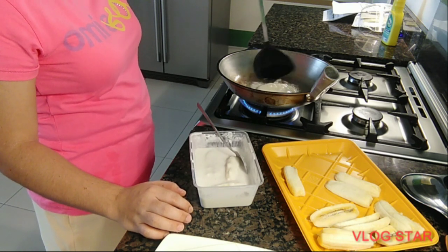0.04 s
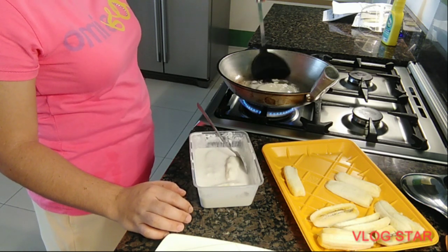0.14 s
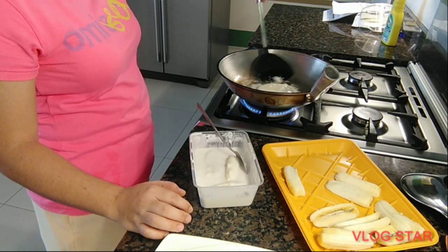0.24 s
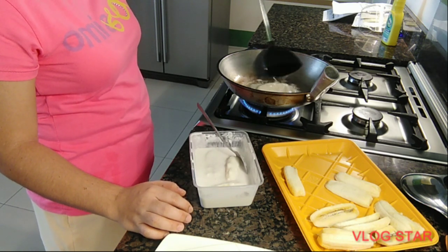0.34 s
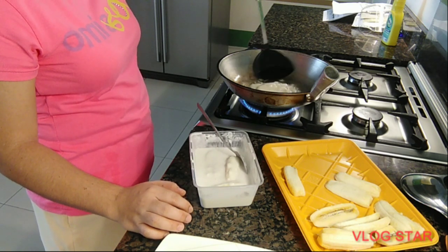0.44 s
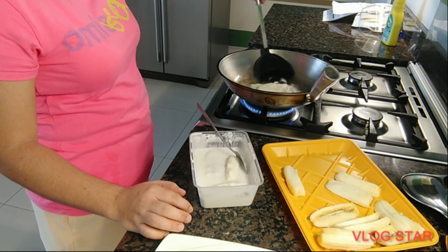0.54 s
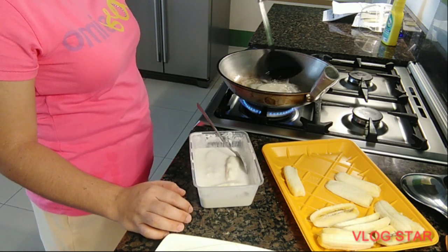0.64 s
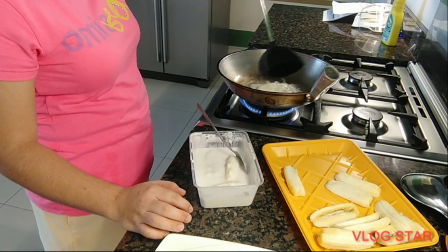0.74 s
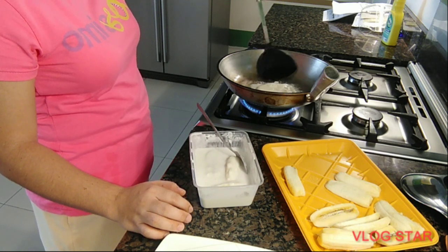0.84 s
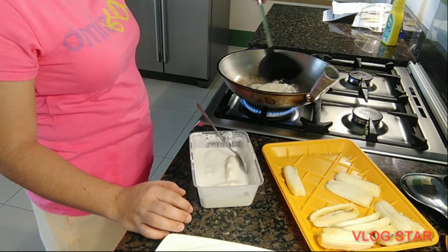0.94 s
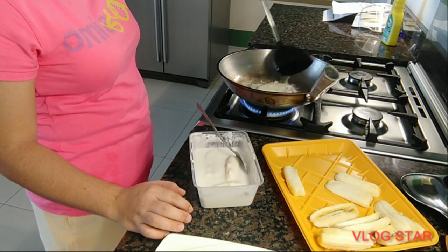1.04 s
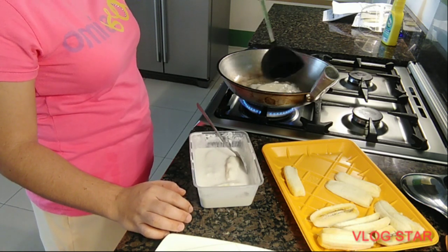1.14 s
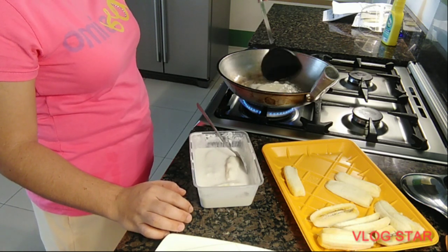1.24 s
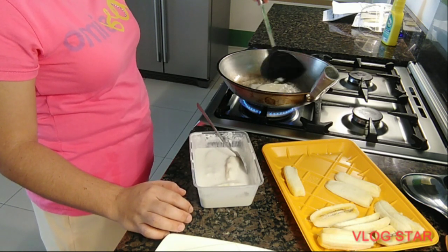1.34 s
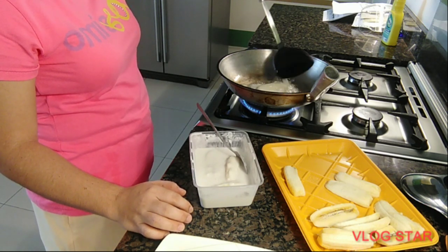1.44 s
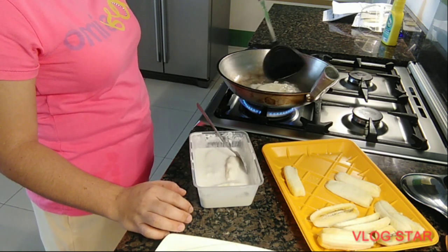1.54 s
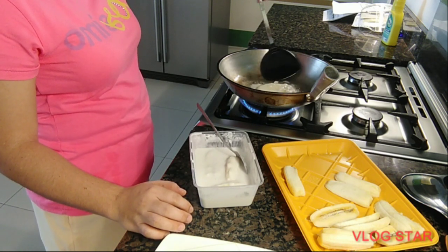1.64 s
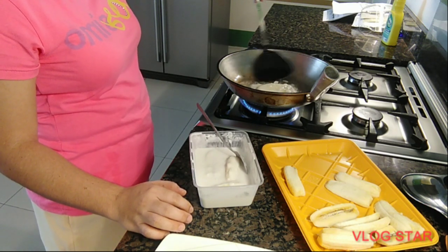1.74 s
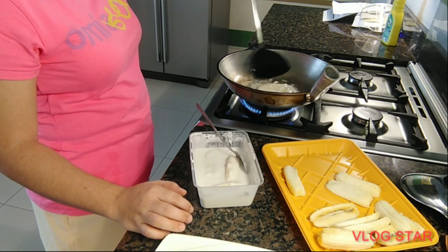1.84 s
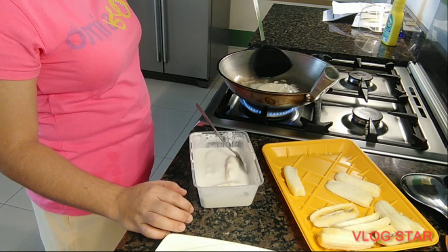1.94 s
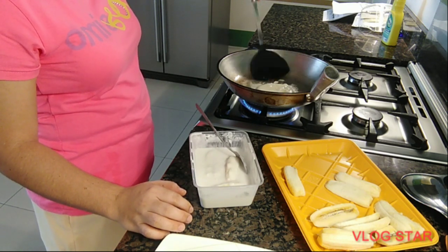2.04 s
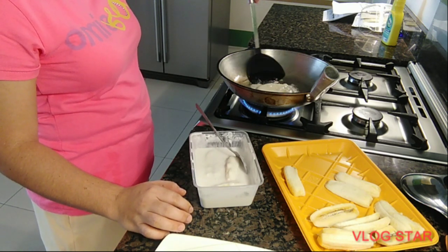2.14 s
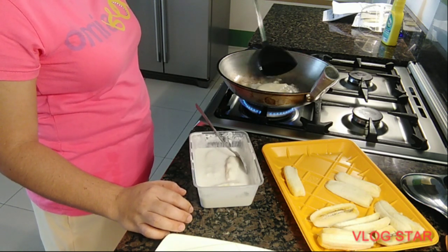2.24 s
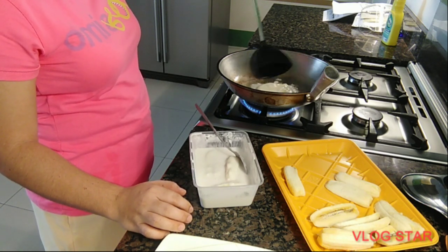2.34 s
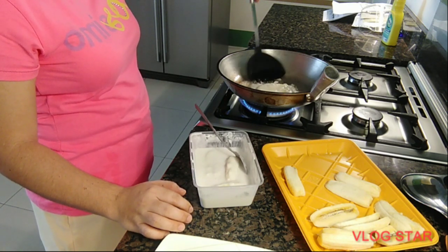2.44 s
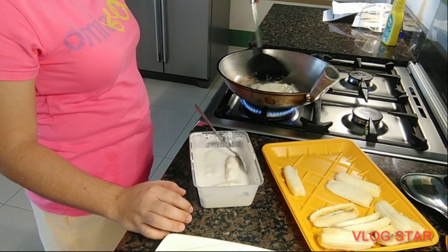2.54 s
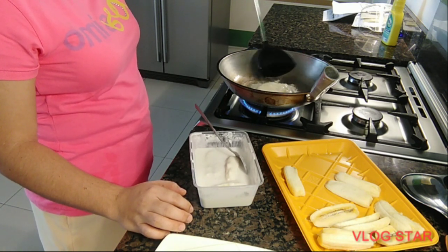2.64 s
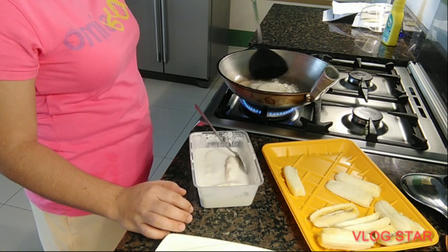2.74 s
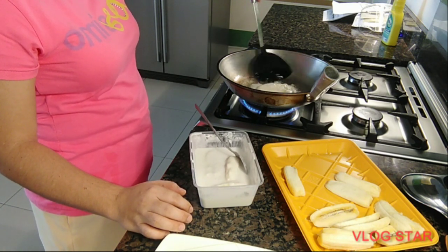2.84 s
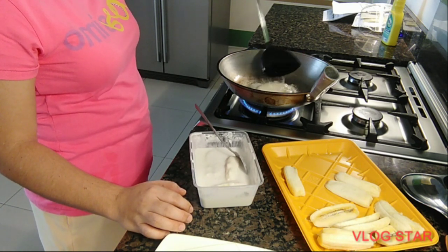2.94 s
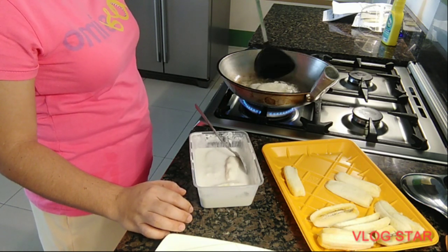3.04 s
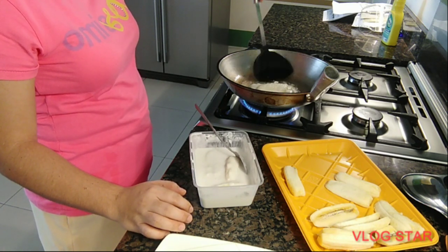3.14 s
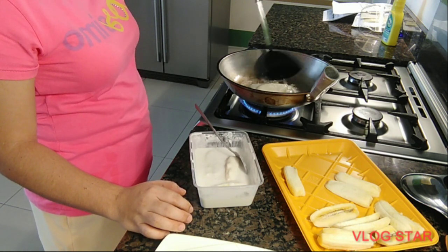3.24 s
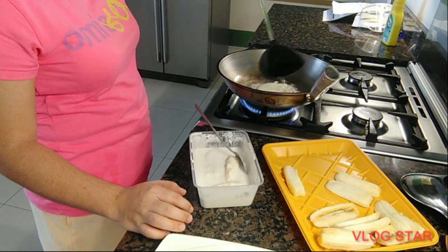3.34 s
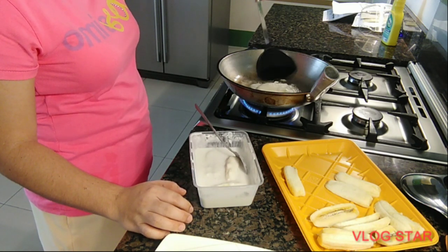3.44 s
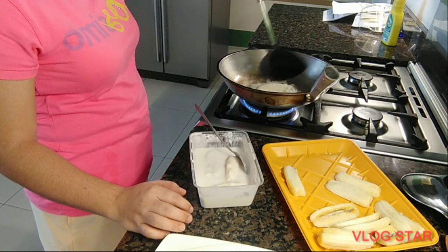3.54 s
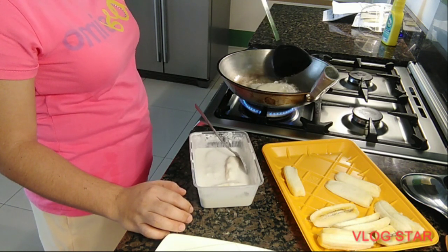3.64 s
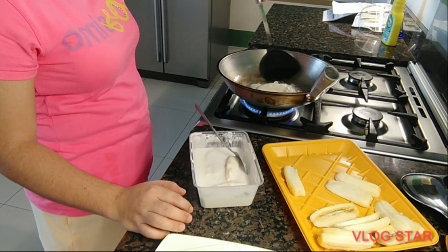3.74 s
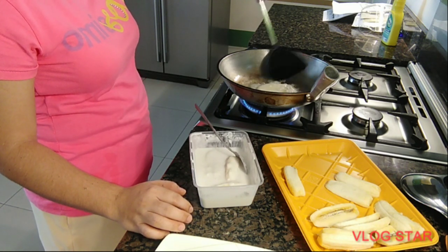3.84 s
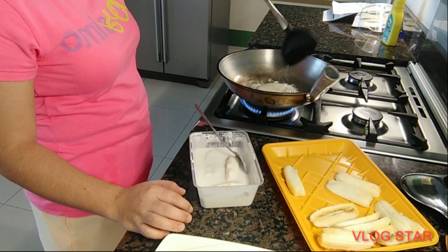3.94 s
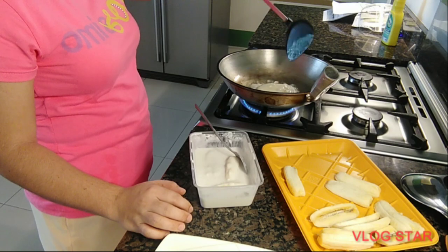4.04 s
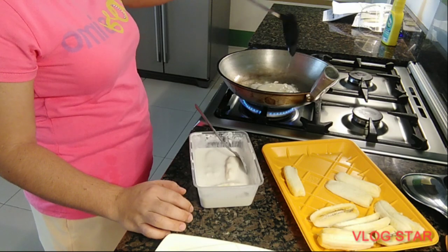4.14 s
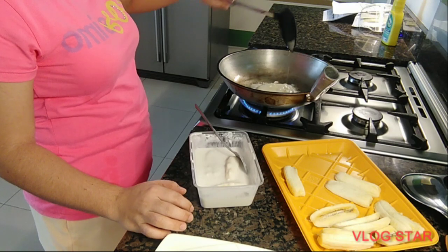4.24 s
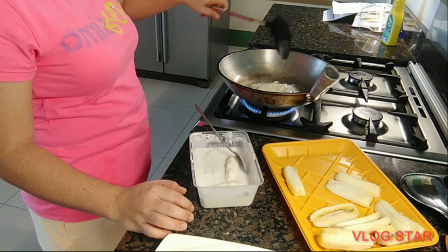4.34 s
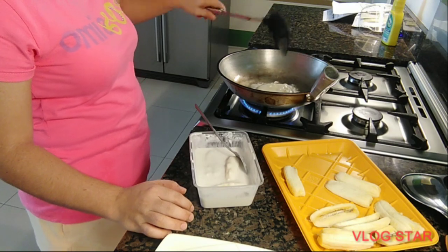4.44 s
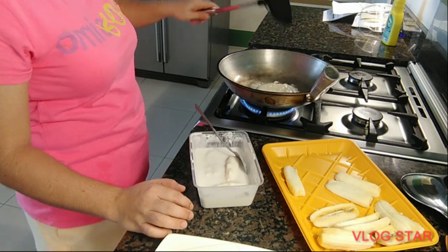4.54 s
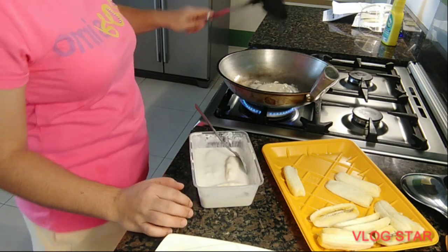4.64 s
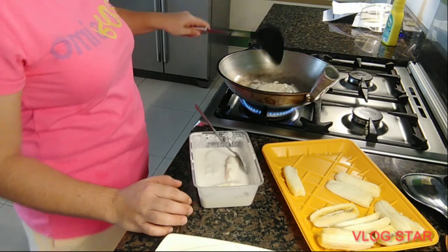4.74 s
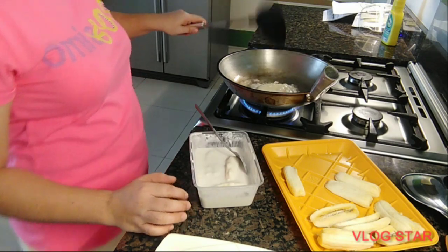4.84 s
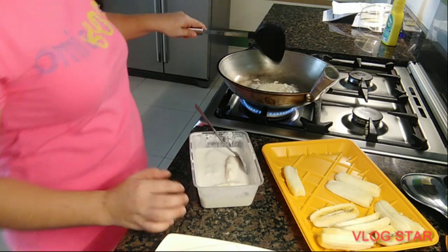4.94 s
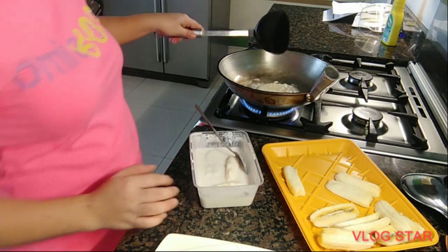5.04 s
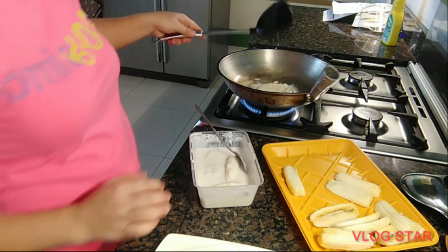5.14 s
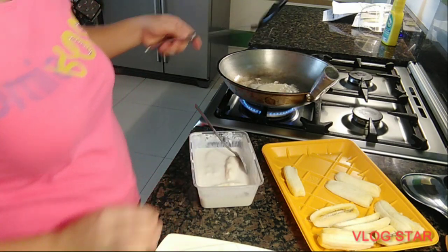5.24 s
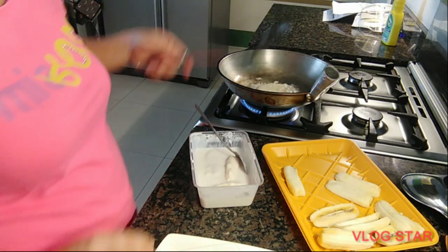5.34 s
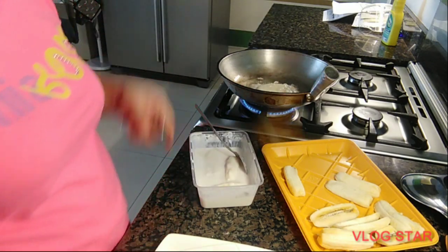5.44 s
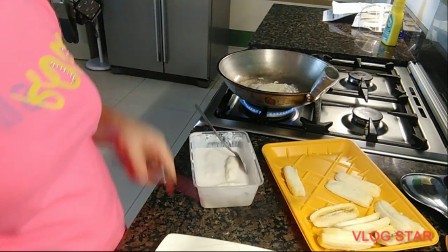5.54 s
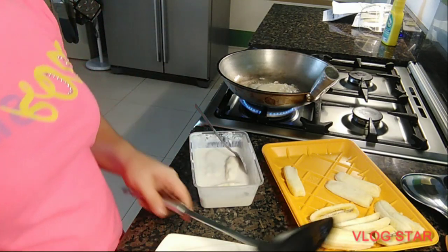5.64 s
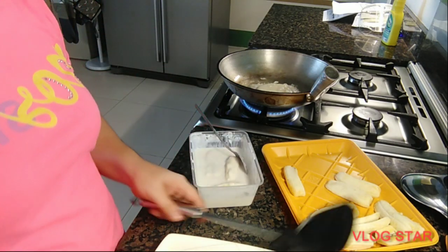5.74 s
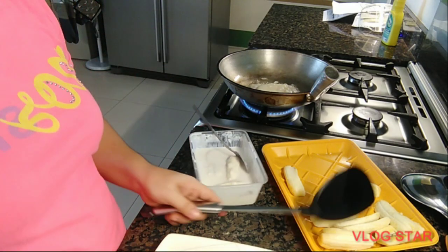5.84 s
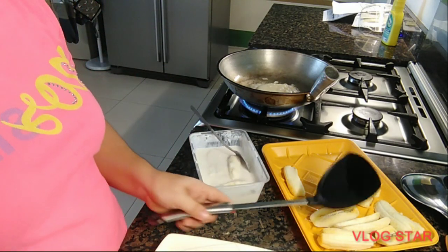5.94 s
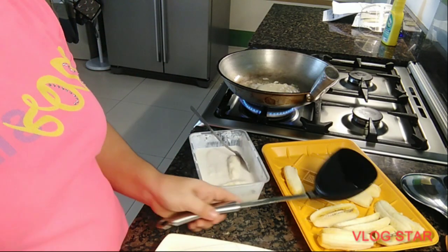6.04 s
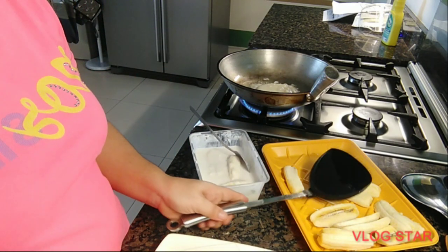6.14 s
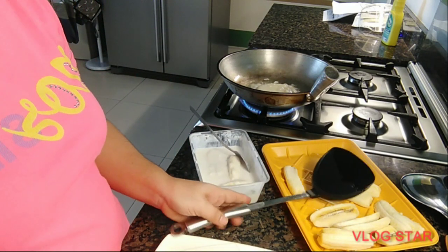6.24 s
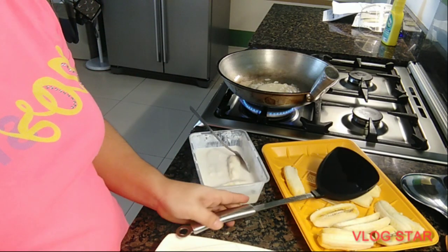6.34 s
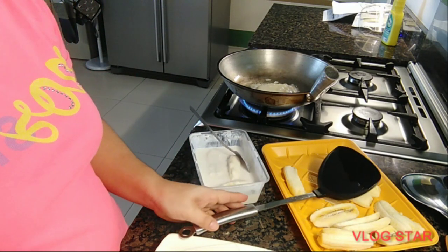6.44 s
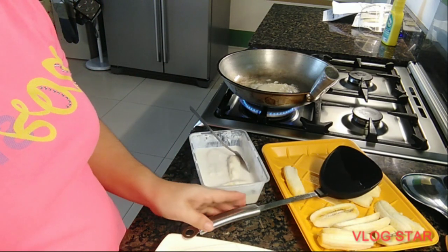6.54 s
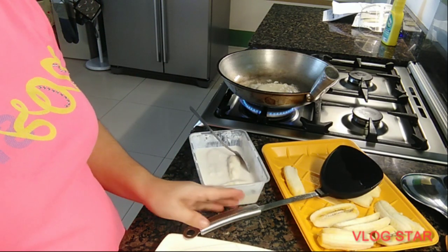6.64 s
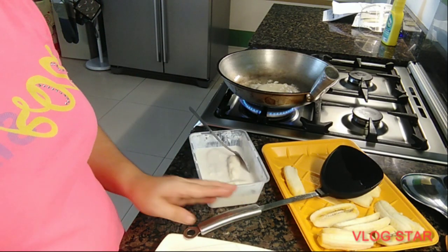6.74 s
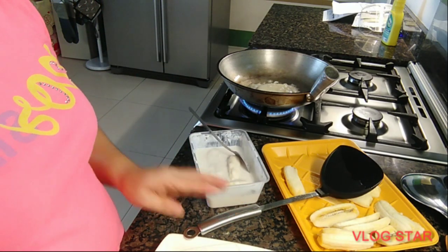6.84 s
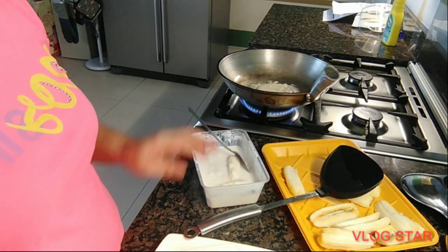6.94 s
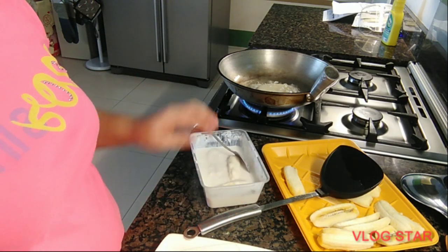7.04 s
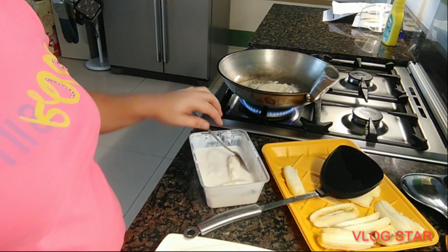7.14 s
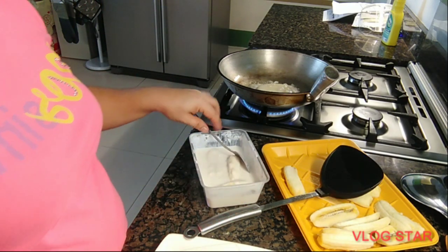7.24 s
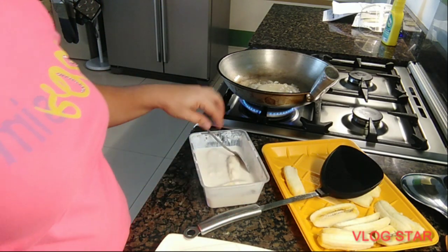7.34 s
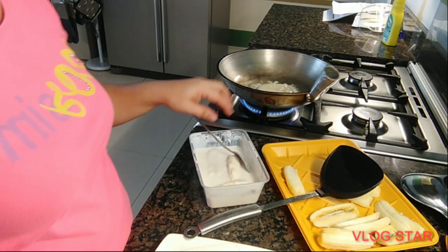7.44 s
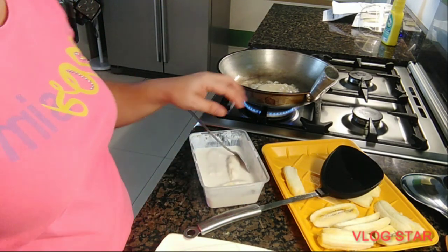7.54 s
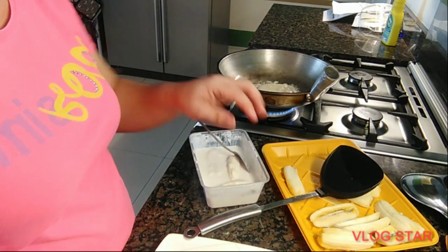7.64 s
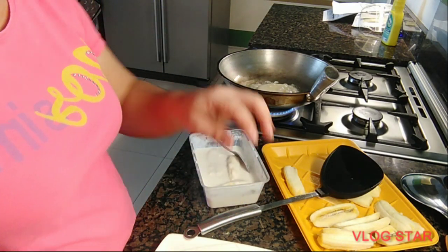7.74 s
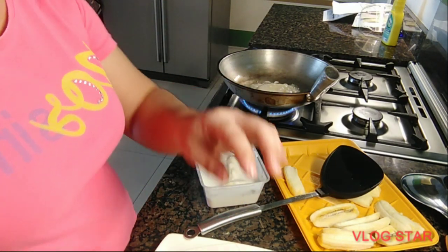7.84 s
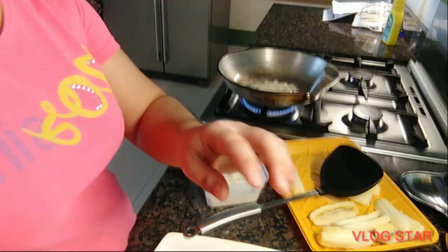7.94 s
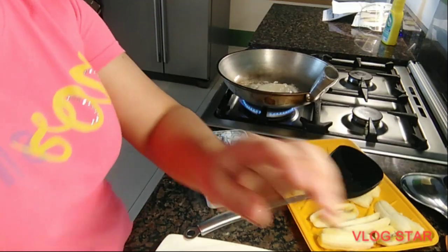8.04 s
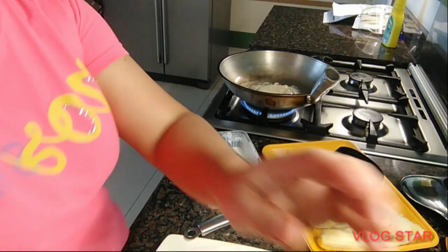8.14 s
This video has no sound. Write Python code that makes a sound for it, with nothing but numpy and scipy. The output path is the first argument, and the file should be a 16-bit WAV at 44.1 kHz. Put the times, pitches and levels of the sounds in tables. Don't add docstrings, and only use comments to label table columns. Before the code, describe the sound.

In a tiled home kitchen, hot oil fizzes brightly close to a phone microphone, with small crackles and larger steam pops. A ladle stirs in uneven swells and knocks the steel wok, loudest near three seconds. The sizzle then calms, until the ladle clatters in rapid bounces on a plastic tray around six and a half seconds. Quiet frying with a few spits follows.

```python
import sys
import numpy as np
from scipy import signal
from scipy.fft import rfft, irfft, next_fast_len
from scipy.io import wavfile
from scipy.ndimage import uniform_filter1d

SR = 44100
rng = np.random.default_rng(int(sys.argv[2]) if len(sys.argv) > 2 else 0)


def voltage_ratio(decibels):
    exponent = np.asarray(decibels, float) / 20
    return 10 ** exponent


def int16_out(signal):
    q = np.round(np.clip(np.atleast_2d(signal).T, -1, 1) * 32767)
    wavfile.write(sys.argv[1], SR, q.astype(np.int16))


N = 361619
TIME = np.arange(N) / SR
TAIL = 24576
AGE = np.arange(TAIL) / SR
CLICK = np.eye(1, TAIL)[0]
FADE = -np.log(1000) * AGE

# t/s, fizz level between strokes/dB, churning of the oil by the ladle/dB
FRYING = [(0.0, -49, -3.5), (0.8, -50.5, -3.5), (1.5, -50.5, -4), (1.84, -48, -9.5), (1.92, -48, -37),
          (2.17, -49.5, -14), (2.24, -49, -4.5), (2.7, -46.5, -1), (3.3, -49, -5.5), (4.05, -51, -17),
          (5.2, -54.5, -16), (5.6, -53.5, -13.5), (6.4, -53.5, -18), (7.5, -53, -12.5), (8.2, -53, -11)]
# f/Hz, level/dB
FIZZ_SPECTRUM = [(1120, -71.5), (1900, -19.5), (2150, -6.5), (2400, -4), (2600, -2.5), (3450, -5),
                 (4590, -1), (5340, -3), (5590, -0.5), (6050, -5), (6900, -5.5), (8000, 0), (8730, -2.5),
                 (9710, -11.5), (16000, -31)]
# peak t/s, swell level/dB, rise/s, fall/s, coarse
# share/dB
SWELLS = [(0.19, 7, 0.08, 0.15, 2.5), (0.36, 5.5, 0.045, 0.07, -7), (0.56, 7.5, 0.15, 0.16, 1.5),
          (0.93, 3.5, 0.08, 0.12, 6), (1.03, 2, 0.088, 0.26, 5.5), (1.68, 7, 0.041, 0.088, -1.5),
          (1.77, 2.5, 0.017, 0.031, 7), (1.888, 16, 0.0079, 0.047, -27), (2.38, 11.5, 0.046, 0.21, -11.5),
          (2.64, 3, 0.068, 0.095, 10.5), (3.567, 2.5, 0.036, 0.04, -2), (4.9, 0.2, 1, 0.34, -1),
          (7.35, 0.3, .3, 0.18, 0), (5.62, 4, 0.22, 0.28, -2)]


def sizzle():
    fine_db, stir_db = curves(FRYING)
    shapes = np.array([ramp(s, rise, fall) for s, _, rise, fall, _ in SWELLS])
    stroke_db = np.array(SWELLS)[:, 1] @ shapes
    coarse_db = -4 + np.array(SWELLS)[:, 4] @ shapes
    swell_db = 0.62 * walk(11)

    small = bursts(rate=3100, spread_db=-2.0, smear=0.0016)
    large = bursts(rate=78, spread_db=-6.0, smear=0.004)
    oil = colour(small + 0.12 * large + 1.03 * rng.standard_normal(N), FIZZ_SPECTRUM)
    coarse, below_spray = [signal.sosfiltfilt(signal.butter(2, hz, fs=SR, output="sos"), oil)
                           for hz in (6000, 11000)]
    fine, spray = below_spray - coarse, oil - below_spray
    fizz = fine * voltage_ratio(0.28 * walk(29))
    fizz = fizz + coarse * voltage_ratio(coarse_db + 0.89 * walk(25))
    fizz = fizz + spray * voltage_ratio(-2 + 0.43 * walk(3.5))

    gurgle = band(bursts(rate=380, spread_db=1.0, smear=0.0059), 1700, 1280)
    churn_db = stir_db - 0.84 * stroke_db + 2.0 * walk(18.0)
    stir = unit(above(gurgle, 1460)) * voltage_ratio(churn_db)
    return voltage_ratio(fine_db + stroke_db + swell_db) * (fizz / fine.std() + stir)


CRACKLE_HZ = (3250, 4760, 6400, 8000)


def crackle():
    fine_db, stir_db = curves(FRYING)
    snaps, noise = 0, rng.standard_normal(N)
    for hz in CRACKLE_HZ:
        when, size = rng.random((70, 2)).T
        power = np.bincount((when * N).astype(int), voltage_ratio(-6.0 * np.log(size + 0.12)), N)
        envelope = np.sqrt(signal.lfilter([1], [1, -np.exp(-1 / (0.0089 * SR))], power))
        snaps = snaps + unit(band(noise * envelope, hz, hz / 5))
    return voltage_ratio(fine_db - 5.5 + 0.44 * stir_db) * above(snaps, 2600)


# f/Hz, bandwidth/Hz, level/dB
MURMUR_BANDS = [(285, 51, -14), (453, 42, -13.5), (637, 75, 1.5), (917, 26, -13), (1267, 72, 4),
                (1538, 200, 2)]
# start t/s, length/s, swell level/dB
SLOSHES = [(0.023, 0.17, 10.5), (0.253, 0.41, 14), (0.753, 0.27, 11), (0.979, 0.219, 15), (1.356, 0.2, 11),
           (1.93, 0.175, 8), (2.388, 0.21, 4), (2.801, 0.65, 9.5), (3.712, 0.11, 8.5), (4.3, 0.16, 9.5),
           (4.706, 0.19, 3.5), (6.33, 0.51, 21), (7.186, 0.27, 5), (7.752, 0.098, 14), (8.012, .24, 13)]


def bowl():
    fizz_db, churn_db = curves(FRYING)
    edge_s = 0.031
    slosh_db = 0
    for s, length, db in SLOSHES:
        half = length / 2
        slosh_db = slosh_db + db * np.minimum(ramp(s + half, half, half) * half / edge_s, 1)
    low_db = fizz_db - 25 + slosh_db
    high_db = fizz_db - 15.5 + 0.38 * churn_db + 0.16 * slosh_db
    out = 0
    for hz, width, db in MURMUR_BANDS:
        base_db, patch_db = (low_db, 5.0) if hz < 900 else (high_db, 3.5)
        murmur = twice_band(rng.standard_normal(N), hz, 1.31 * width)
        out = out + voltage_ratio(base_db + db + patch_db * np.tanh(walk(30))) * unit(murmur)
    return out


# t/s, peak level/dB, f/Hz, sharpness Q, room rel. level/dB
BUBBLES = [(0.107, -33, 4600, 6, 11), (0.177, -28, 4570, 5.7, -11), (0.409, -30, 3130, 8, -12),
           (0.809, -19.5, 3460, 4.3, -1.5), (0.862, -29, 3580, 16, -3), (0.991, -23, 4740, 3.5, -1),
           (1.262, -27, 5130, 7.2, -3.5), (1.55, -24, 3530, 3.3, -3), (1.652, -18.5, 4140, 10, -1.5),
           (1.76, -20.5, 5060, 6.5, -3), (1.886, -12, 4196, 8.5, -3.5), (2.03, -23.5, 5100, 2.6, -11),
           (2.624, -19, 4620, 5.4, 0), (2.792, -18.5, 2810, 7.9, -1.5), (2.904, -17, 4250, 5.7, -5),
           (4.143, -24.5, 5280, 7.6, -2.5), (5.541, -32, 4250, 4, -9), (5.617, -32, 4730, 4.7, -7),
           (5.843, -23, 6090, 6.7, -2), (5.962, -23.5, 7970, 38, -12), (8.091, -24.5, 2810, 0.81, -1.5),
           (8.172, -21, 6000, 7, -8), (8.189, -29, 6400, 3.7, -7)]
# t/s, peak level/dB, f/Hz, sharpness Q, room rel. level/dB
FAINT_POPS = [(1.701, -29, 8250, 6, -13), (1.792, -29, 4770, 6.7, 1), (3.816, -35, 8200, 8, -30),
              (4.437, -38, 4700, 4, -14), (5.264, -38, 4270, 4.8, -10), (5.292, -36, 8000, 6, -8),
              (5.464, -38, 7800, 8, -10), (6.191, -47, 8140, 8, -15), (0.412, -37, 1570, 9, -12),
              (6.99, -44, 14200, 3, -20), (7.548, -33, 12500, 2.5, -10), (7.646, -32, 13000, 3, -7)]
# t/s, peak level/dB, crack rel. level/dB, room rel. level/dB
SPITS = [(0.009, -23.5, -26, -13), (0.354, -28, -11, -21), (0.373, -24, -11, -8), (1.236, -29, -20, 2),
         (1.675, -21, -5, -16), (1.853, -18.5, 3, -24), (2.232, -22, 4, -5.5), (2.345, -36, -2, -16),
         (2.371, -20.5, -8, -32), (2.435, -25.5, 9, 6), (2.654, -22, -18, -1), (3.269, -25, 10, -20),
         (4.004, -32, 11, -1), (4.076, -27, 1, -7.5), (4.249, -38, 10, -3), (4.69, -30, 3, -1),
         (5.429, -31.5, 9, -10), (5.589, -35, -28, -12), (5.638, -28.5, 2, -6), (5.784, -28, 2, -3.5),
         (6.205, -33, 6, -23), (6.358, -26, -27, -15), (7.249, -40, -11, 2), (7.546, -25.5, 3, 0.5),
         (7.556, -30.5, 16.5, -2.5), (7.644, -25.5, -1, -4), (7.729, -34, 14, -14), (7.788, -30, 17, -25),
         (7.96, -35.5, -12, -7), (8.148, -28.5, 14, -8)]
# t/s, peak level/dB, f/Hz
TICKS = [(0.669, -28, 2200), (0.785, -37, 1560), (1.149, -29, 2280), (1.391, -34.5, 1740),
         (1.807, -28, 2240), (2.199, -27, 2130), (3.615, -27, 2200), (3.697, -36, 2220), (3.718, -36, 2250)]
# t/s, peak level/dB, sharpness Q, crack rel. level/dB
TOUCHES = [
    (6.329, -13, 1, 9.5),
    (6.407, -18.5, 2.4, 2),
]
# f/Hz, level/dB, t60/s
RIM_MODES = [(1260, 1.5, .2), (1793, 0, 0.12), (2330, -9, .1), (2730, -1, 0.18)]


def pops():
    bubble_crack_db = -9
    rows = [(s, db, hz, q, bubble_crack_db + (7 - q) / 4, room_db) for s, db, hz, q, room_db in BUBBLES]
    rows += [(s, db, 7870 * (1 + 0.034 * rng.standard_normal()), 12.7, crack_db, room_db)
             for s, db, crack_db, room_db in SPITS]
    rows += [(s, db, hz, 4.0, 0.5, -17.5) for s, db, hz in TICKS]
    rows += [(s, db, 1360, q, crack_db, -8) for s, db, q, crack_db in TOUCHES]
    rows += [(s, db, hz, q, bubble_crack_db, room_db) for s, db, hz, q, room_db in FAINT_POPS]

    low, high = np.zeros((2, N + TAIL))
    noise = rng.standard_normal((len(rows), TAIL))
    crack = unit(band(colour(CLICK, FIZZ_SPECTRUM, 0.36), 6900, 13400))
    mist = unit(above(CLICK, 9400))
    for (s, db, hz, q, crack_db, room_db), n in zip(rows, noise):
        bubble = unit(band(band(CLICK, hz, 2.25 * hz / q), hz, 3 * hz / q))
        bubble = bubble + .5 * unit(band(CLICK, hz, 0.11 * hz / q))
        if hz < 1500:
            tone = voltage_ratio(-8.5) * held(RIM_MODES)
        else:
            tone_db = -30.5 + 0.44 * q - 0.59 * crack_db
            tone = voltage_ratio(tone_db) * unit(ring([(hz, 0, .2)]) * waver(n, 6.6))
        if hz > 7000:
            snap = crack + 0.26 * mist
        elif hz > 1500:
            snap = crack
        else:
            snap = unit(band(crack, 3500, 4700))
        out = high if hz > 1500 else low
        add(out, bubble + voltage_ratio(crack_db) * snap, kitchen(n, room_db), s, db, tone)
    return above(high[:N], 1300) + above(low[:N], 200)


# t/s, peak level/dB, ring rel. level/dB, low boom rel. level/dB, room rel. level/dB,
# lowest mode level/dB, mode tilt/dB per octave
KNOCKS = [
    (0.278, -18.5, -3, -30.5, 2, 13.5, 1),
    (1.02, -26.5, 1.5, -39, 0, -19, -1),
    (1.437, -27.5, -3, -43, -19, -12, 1),
    (2.593, -11, -10, -21, -3, 11, 3),
    (2.947, -10, 2.5, -9, -1, 13.5, -1),
    (3.295, -32.5, 4.5, -40, -21, -16, -9),
]
WOK_HZ = (1244, 1481, 1627, 1888, 2177, 2427, 2815, 3171, 3600, 3704, 4269, 4557, 4900, 5346)
# level/dB, t60/s
WOK_LEVELS = [(-11.5, 0.3), (-6, 0.93), (8, 0.36), (-3, 0.7), (-3, 0.76), (-6.5, 0.82), (-15.5, 1),
              (-22, 0.41), (0, 0.5), (1, 0.12), (-5, 0.71), (-5.5, 0.64), (-3, 0.45), (-8.5, 0.8)]
STOVE_HZ = (291, 345, 388, 468, 529, 797, 910, 1012)
# level/dB, t60/s
STOVE_LEVELS = [(8.5, 0.43), (-12, 0.48), (2.5, 0.79), (-9.5, 1.1), (-2.5, 1.1), (-7, 0.21), (1, .33),
                (0.5, 0.42)]
# f/Hz, level/dB
KNOCK_SPECTRUM = [(59, -74), (100, -25), (260, -44), (1130, -6), (1650, 1.5), (2000, -15), (2170, -6),
                  (2580, -2), (3540, -6.5), (7940, -0.5), (16000, -46)]


def knocks():
    out, noise = np.zeros(N + TAIL), rng.standard_normal((len(KNOCKS), TAIL))
    tick = unit(above(colour(CLICK, KNOCK_SPECTRUM), 1235))
    thud = unit(above(band(CLICK, 380, 1050), 206))
    grate = ring(modes(STOVE_HZ, STOVE_LEVELS))
    grate = grate + 0.47 * ring(modes(np.multiply(STOVE_HZ, 1.035), STOVE_LEVELS), .7)
    boom = grate * onset(0.041)
    for (s, db, ring_db, boom_db, room_db, base_db, tilt_db), n in zip(KNOCKS, noise):
        struck = []
        for (hz, level_db, t60), c in zip(modes(WOK_HZ, WOK_LEVELS), n):
            place_db = base_db if hz == WOK_HZ[0] else tilt_db * np.log2(hz / 1600)
            struck.append((hz, level_db + 1.3 * c + place_db, t60))
        steel = unit(ring(struck) * waver(n, 1.8) * (1 + 1.8 * decay(0.059)) * onset(0.0037))
        shell = unit(twice_band(n[::-1], 1350, 870) * decay(0.44) * onset(0.009))
        rings = voltage_ratio(ring_db) * (steel + voltage_ratio(-13) * shell)
        rings = rings + voltage_ratio(boom_db) * unit(boom * waver(n[::-1], 2.9))
        rings = rings + voltage_ratio(-15 + .5 * base_db) * held([(1286, 0, .15)])
        blow = tick + voltage_ratio(boom_db - 2) * thud + 0.15 * unit(ring(struck, 0.45))
        add(out, blow, kitchen(n, room_db), s, db, rings)
    return above(out[:N], 94)


# t/s, peak level/dB, ring rel. level/dB, brightness/dB per octave, room rel. level/dB,
# pressed ring rel. level/dB
DROPS = [
    (6.447, -0.5, -10.5, 2, -13, -2.5),
    (6.478, -8.5, -11.5, 2, -10.5, -4.5),
    (6.518, -2, -10, 2.2, -9, 0),
    (6.549, -12, -8, -1, -13.5, -7.5),
    (6.5807, 0.5, -11, 3, -13, -3.5),
    (6.618, -7, -7.5, 1, -10, -2),
]
TRAY_HZ = (287, 345, 790, 920, 950, 1200, 1430, 1503, 2215, 2500, 2660, 3510, 3750, 6150)
# level/dB, t60/s
TRAY_LEVELS = [(-5.5, 0.17), (-9, 0.17), (-14.5, 0.55), (-15, 0.23), (-8, 0.11), (-7, 0.14), (-3, 0.19),
               (-2.5, 0.19), (-14.5, 0.14), (-9, 0.15), (-6.5, 0.2), (-27, 0.11), (-8, .1), (-8.5, 0.07)]
# f/Hz, level/dB, t60/s
PRESSED_MODES = [(796, -10.5, .3), (947, -0.5, 0.59), (1203, -5, 0.14), (1434, -9, 0.16),
                 (1509, -8.5, 0.23), (2234, -9, .2), (2670, -9.5, 0.22), (3520, -14, 0.17),
                 (6230, -4.5, 0.12), (7630, -9, .1)]
# f/Hz, level/dB
DROP_SPECTRUM = [(120, -43), (200, -25), (328, -7.5), (659, -25.5), (933, -10), (1080, -17.5),
                 (1350, -10.5), (2400, -12), (3310, -14.5), (7970, -17), (16000, -49.5)]
PRESS_S = 0.017


def drops():
    out, noise = np.zeros(N + TAIL), rng.standard_normal((len(DROPS), TAIL))
    fading = 1 / (1 + (AGE / 0.23) ** 5)
    plastic = ring(modes(TRAY_HZ, TRAY_LEVELS))
    rattle = onset(0.0011) / (1 + (AGE / 0.013) ** 6) * decay(0.05)
    press = unit(above(ring(PRESSED_MODES), 805) * onset(0.0041) / (1 + (AGE / PRESS_S) ** 8))
    for (s, db, ring_db, tilt_db, room_db, press_db), n in zip(DROPS, noise):
        tray = unit(plastic * (0.8 * decay(0.69) + 0.97) * fading * waver(n, 4.8) * onset(0.0089))
        hollow = unit(twice_band(n, 920, 96) * decay(0.41))
        tray = tray + voltage_ratio(-2) * hollow
        spot = .8 * noise[0] + .6 * n[::-1]
        room = 0.97 * kitchen(spot, room_db + 5.5) + voltage_ratio(-11.5) * spot * rattle
        room = room / (1 + (AGE / 0.64) ** 6)
        crack = unit(colour(CLICK, DROP_SPECTRUM, tilt_db)) + 0.24 * unit(plastic * decay(0.091))
        add(out, crack, room, s, db, voltage_ratio(ring_db) * tray + voltage_ratio(press_db) * press * waver(n, 0.84))
    return above(out[:N], 260)


# t/s, peak level/dB, f/Hz, t60/s
THUMPS = [(0.314, -49, 262, 0.073), (0.524, -47, 683, 0.28), (2.63, -37, 287, 0.34),
          (2.705, -37, 285, 0.071), (2.711, -55, 109, 0.67), (2.72, -68, 78.5, 0.46),
          (2.804, -44, 289, 0.23), (2.961, -44.5, 113, 0.47), (3.0, -47, 81, .5), (3.109, -49, 122, 0.17),
          (2.97, -51, 197, .5), (2.66, -58, 187, .4), (3.385, -55, 119, 0.6), (3.496, -55.5, 900, 0.16),
          (3.7, -68, 119, .6), (4.39, -62, 119.3, 0.32), (4.68, -65, 118, 0.6), (6.05, -60, 116, 0.46),
          (7.08, -68.5, 119, 0.57), (3.82, -61, 611, .15), (3.88, -63, 1260, .1), (4.519, -54, 1278, 0.19),
          (4.613, -59, 1285, .1), (4.8, -56.5, 657, 0.11), (5.151, -59, 1310, 0.076),
          (5.332, -63, 663, 0.051), (5.601, -51, 1250, 0.046), (5.81, -54.5, 116, 0.49),
          (5.86, -57, 662, 0.088), (6.328, -41.5, 300, 0.064), (6.949, -56, 430, .06), (7, -57, 443, 0.08),
          (7.003, -51.5, 1238, 0.14), (7.148, -59, 368, 0.051), (7.2, -52.5, 660, .08),
          (7.28, -64, 1270, 0.12), (7.44, -58.5, 600, 0.11), (7.923, -51, 850, 0.087)]


def thumps():
    out, noise = np.zeros(N + TAIL), rng.standard_normal((len(THUMPS), TAIL))
    for (s, db, hz, t60), n in zip(THUMPS, noise):
        bump = ring([(hz, 0, t60)]) * onset(2.3 / hz) ** 2 * waver(n, 6 * min(hz / 700, 1))
        add(out, bump, CLICK, s, db)
    return out[:N]


# f/Hz, level/dB rms
HUM = [(59.2, -68), (96.9, -85.5), (118.4, -78)]
# f/Hz, level/dB
AIR_SPECTRUM = [(18, -49), (30, -13), (65, -6), (171, -17), (284, -10.5), (499, -20.5), (638, -28),
                (774, -24.5), (923, -18.5), (2000, -20.5), (2600, -59), (4400, -120)]


def fridge():
    lines = 0
    for k, (hz, db) in enumerate(HUM):
        level = voltage_ratio(db + 3.5 + (-0.3 + .8 * k) * walk(11))
        lines = lines + level * np.sin(2 * np.pi * hz * TIME + 0.22 * k * walk(5.1))
    air = unit(colour(rng.standard_normal(N), AIR_SPECTRUM))
    return lines + voltage_ratio(-69 + 0.22 * walk(27)) * air


NEAR = decay_near = np.exp(FADE / 0.072) / (1 + (AGE / 0.015) ** 8)
NEAR = decay_near + 0.99 * np.exp(FADE / 0.037) + 1.67 * np.exp(FADE / 0.004)
NEAR = NEAR * np.minimum(AGE / 0.000083, 1)


def kitchen(noise, room_db):
    dull = band(noise, 1100, 3800)
    tail = (dull * decay(0.58) + (noise - dull) * decay(0.44)) * onset(0.0042)
    return noise * NEAR + voltage_ratio(room_db) * tail


def add(out, sound, response, s, db, direct=0.):
    heard = unit(irfft(rfft(sound) * rfft(response), TAIL)) + direct
    k = int(s * SR)
    out[k:k + TAIL] += heard * voltage_ratio(db) / np.abs(heard[:1800]).max()


def bursts(rate, spread_db, smear):
    chance, size = rng.random((2, N))
    clicks = (chance < rate / SR) * voltage_ratio(-spread_db * np.log(size + 0.0037))
    power = signal.lfilter([1], [1, -np.exp(-1 / (smear * SR))], clicks ** 2)
    return unit(rng.standard_normal(N) * np.sqrt(power))


def ring(modes, shorten=1.0):
    return sum(voltage_ratio(db) * np.sin(2 * np.pi * hz * AGE) * decay(t60 * shorten) for hz, db, t60 in modes)


def held(modes):
    return unit(ring(modes) * onset(0.0027) / (1 + (AGE / PRESS_S) ** 8))


def modes(hz, rows):
    return [(f, *row) for f, row in zip(hz, rows)]


def decay(t60):
    return np.exp(FADE / t60)


def onset(rise_s):
    return np.minimum(AGE / rise_s, 1)


def waver(noise, depth_db):
    return voltage_ratio(depth_db * unit(uniform_filter1d(uniform_filter1d(noise, size=500), size=300)))


def walk(rate):
    k = int(SR / rate)
    steps = np.repeat(rng.standard_normal(N // k + 1), k)
    return 2.94 * uniform_filter1d(uniform_filter1d(steps, k), k)[:N]


def ramp(s, rise, fall):
    return np.interp(TIME, [s - rise, s, s + fall], [0, 1, 0])


def curves(table):
    s, *columns = np.transpose(table)
    return [np.interp(TIME, s, c) for c in columns]


def colour(x, points, tilt_db=0.):
    size = next_fast_len(len(x))
    hz, db = np.transpose(points)
    octave = np.log2(np.maximum(np.arange(size // 2 + 1) * SR / size, 1))
    gain_db = np.interp(octave, np.log2(hz), db) + tilt_db * (octave - 11)
    cep = irfft(np.log(voltage_ratio(gain_db)), size)
    cep[1:size // 2] *= 2
    cep[size // 2 + 1:] = 0
    return irfft(rfft(x, size) * np.exp(rfft(cep)), size)[:len(x)]


def band(x, hz, width):
    b, a = signal.iirpeak(hz, max(hz / width, .3), SR)
    return signal.lfilter(b, a, x)


def twice_band(x, hz, width):
    return band(band(x, hz, width), hz, width)


def above(x, hz):
    return signal.sosfilt(signal.butter(6, hz, "high", fs=SR, output="sos"), x)


def unit(x):
    return x / np.sqrt(np.mean(x ** 2))


# f/Hz, bandwidth/Hz, share removed
DIPS = [(1986, 140, 0.57), (2396, 100, 0.45), (3100, 24, 0.074), (5500, 260, 0.62), (12600, 250, 0.51)]


def scene():
    oil = sizzle() + crackle()
    for hz, width, share in DIPS:
        oil = oil - share * band(oil, hz, width)
    echoes = (rng.standard_normal(TAIL) * decay(.035))[:2048]
    oil = oil + voltage_ratio(-15) * signal.oaconvolve(oil, echoes / np.linalg.norm(echoes))[:N]
    mono = oil + bowl() + pops() + knocks() + drops() + thumps() + fridge()
    return np.array([mono, mono])


def denoise(x, floor_db=-15, low_hz=1500, top_hz=2300):
    hz, _, z = signal.stft(x, SR, nperseg=1024)
    power = uniform_filter1d(np.abs(z) ** 2, size=3, axis=1)
    steady = uniform_filter1d(np.quantile(power, 1 / 3, axis=1), size=9)
    reach = 1 / (1 + (hz / top_hz) ** 12) / (1 + (low_hz / (hz + 1)) ** 8)
    gain = np.maximum(1 - (reach * steady)[:, None] / power, voltage_ratio(2 * floor_db))
    return signal.istft(z * np.sqrt(gain), SR, nperseg=1024)[1][:N]


def roll_off(x):
    return signal.sosfilt(signal.butter(12, 16460, fs=SR, output="sos"), x)


def record(dry):
    rounded = np.tanh(denoise(dry[0]) / 1.5) * 1.5
    low_pass = signal.ellip(6, .5, 25, 15800, fs=SR, output="sos")
    mono = signal.sosfilt(low_pass, np.clip(rounded, -.9, .9))
    return roll_off(np.array([mono, mono]))


dry = scene()
out = record(dry)
int16_out(out)
```